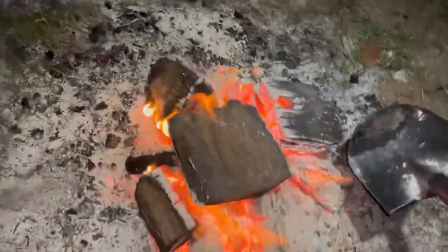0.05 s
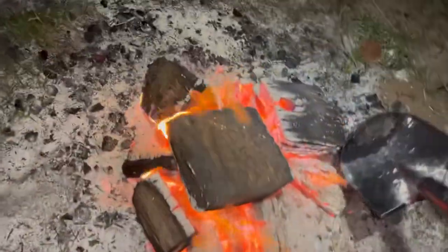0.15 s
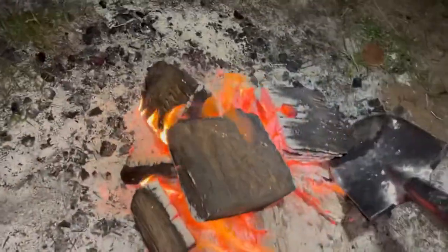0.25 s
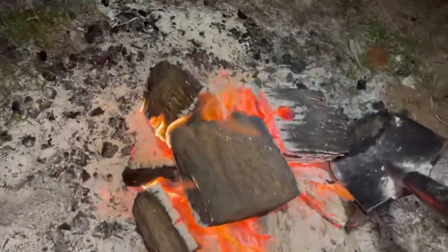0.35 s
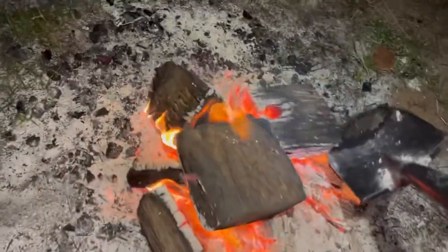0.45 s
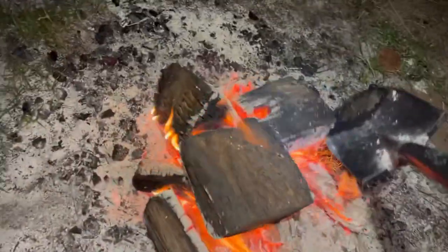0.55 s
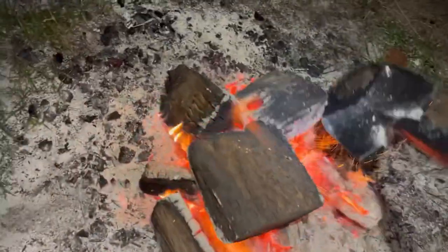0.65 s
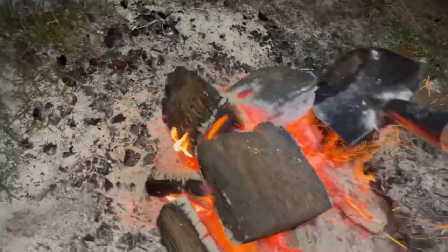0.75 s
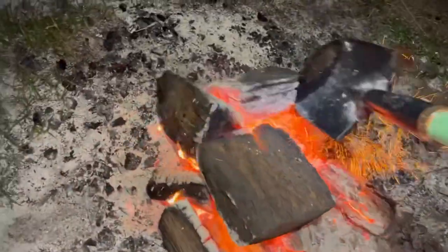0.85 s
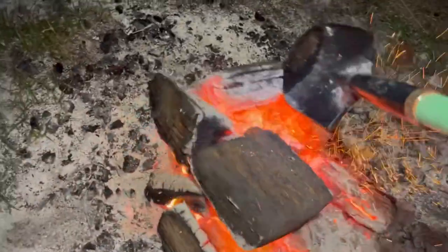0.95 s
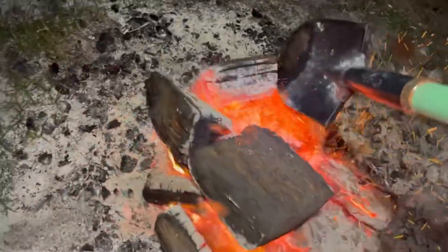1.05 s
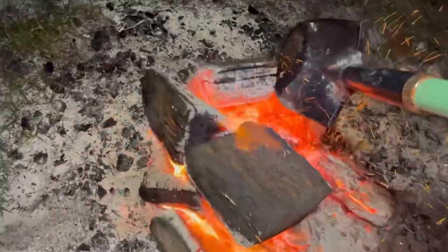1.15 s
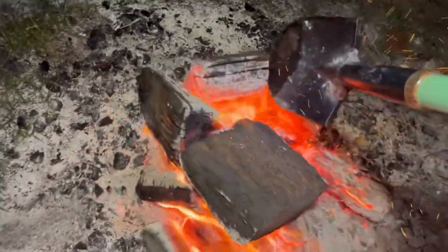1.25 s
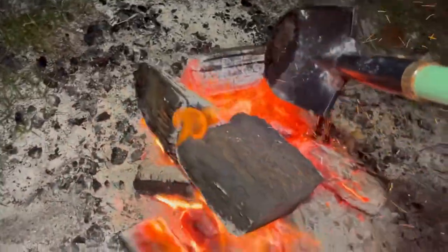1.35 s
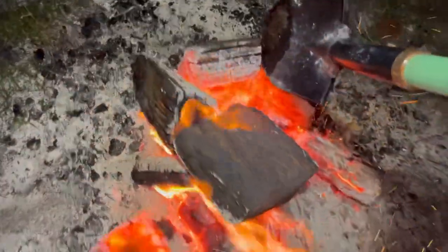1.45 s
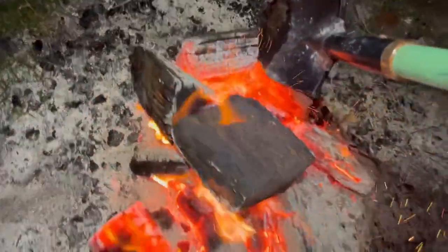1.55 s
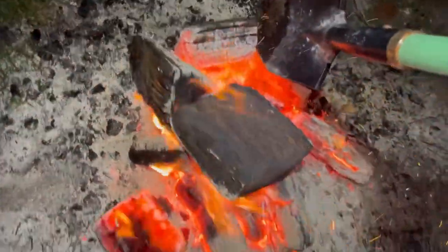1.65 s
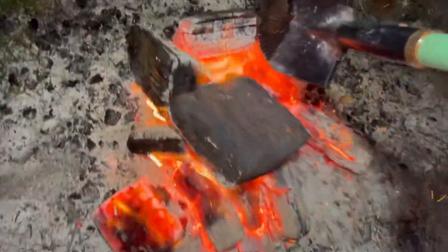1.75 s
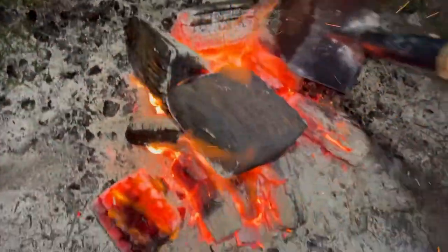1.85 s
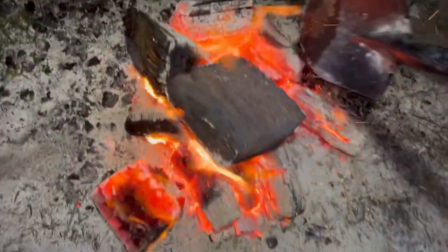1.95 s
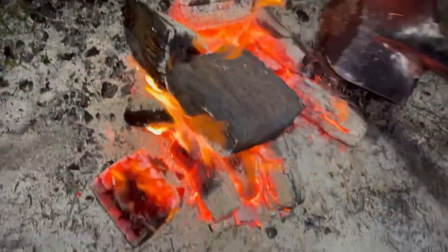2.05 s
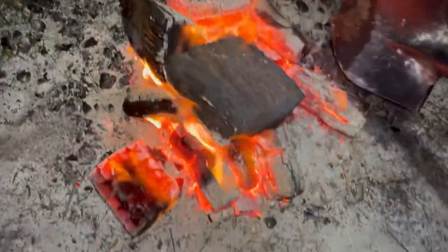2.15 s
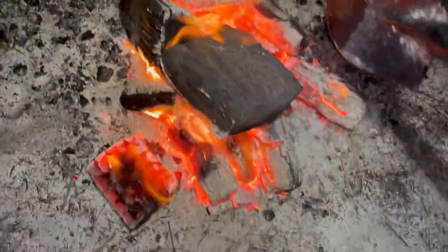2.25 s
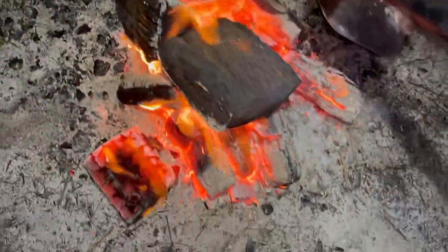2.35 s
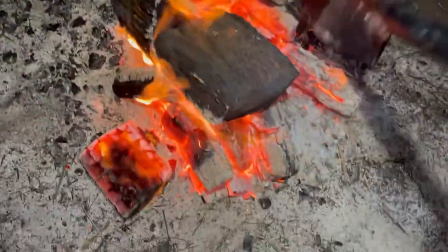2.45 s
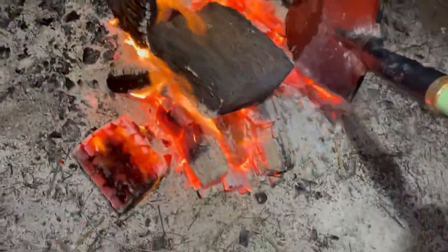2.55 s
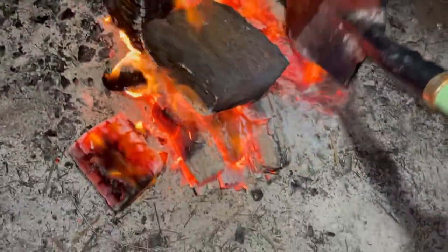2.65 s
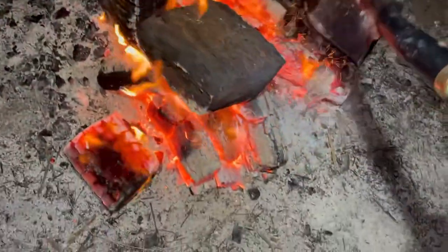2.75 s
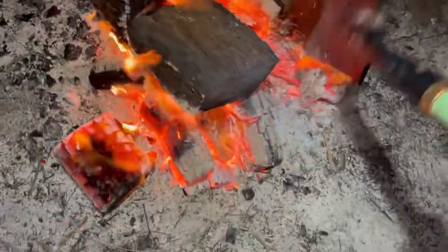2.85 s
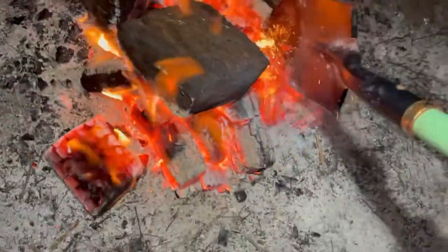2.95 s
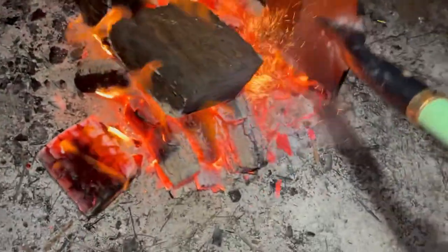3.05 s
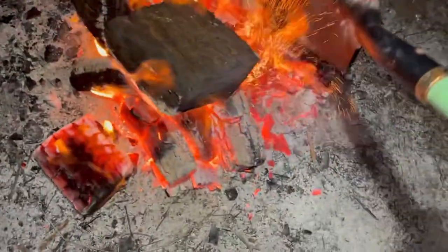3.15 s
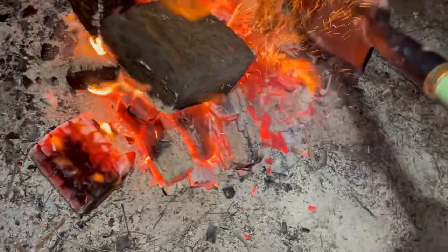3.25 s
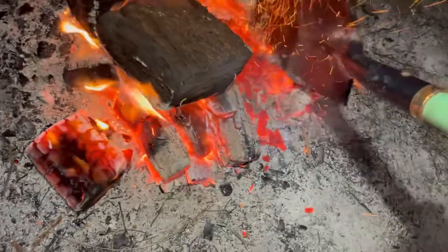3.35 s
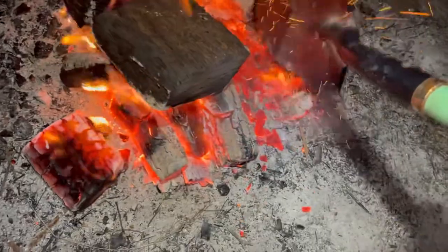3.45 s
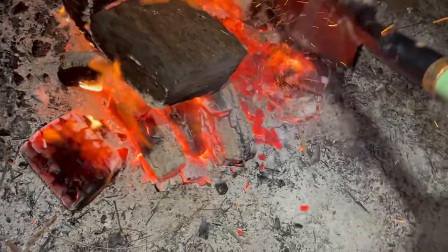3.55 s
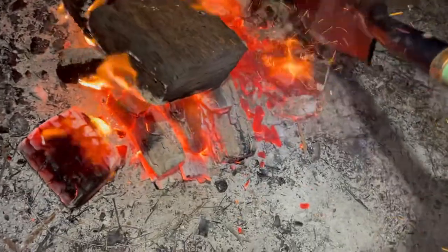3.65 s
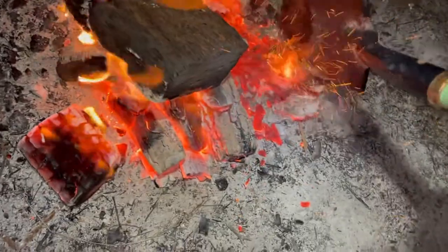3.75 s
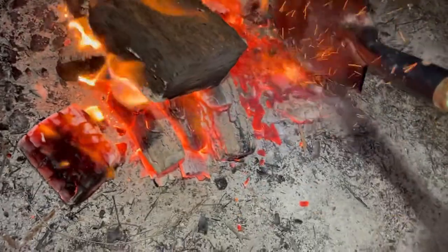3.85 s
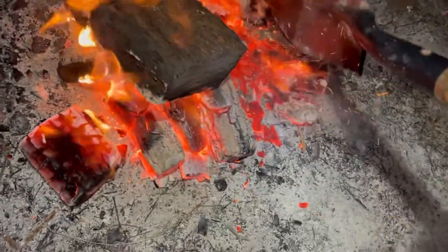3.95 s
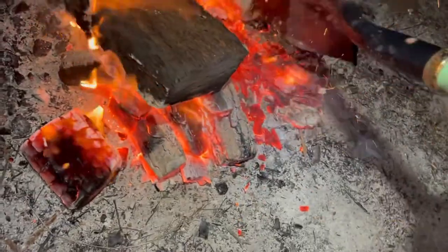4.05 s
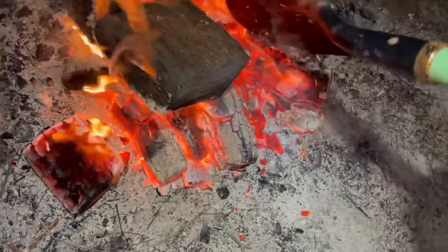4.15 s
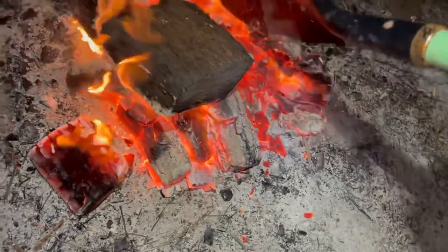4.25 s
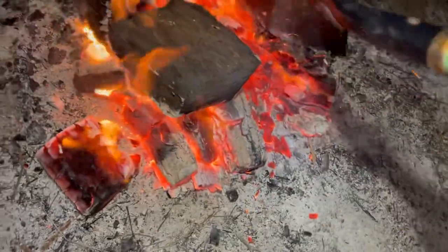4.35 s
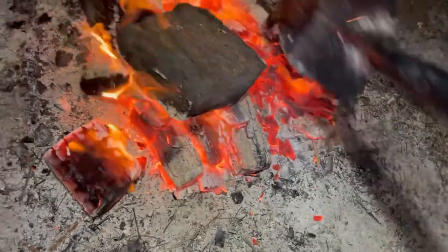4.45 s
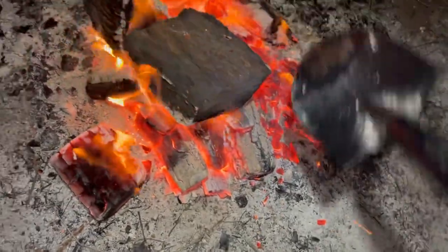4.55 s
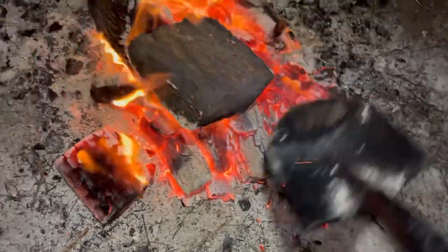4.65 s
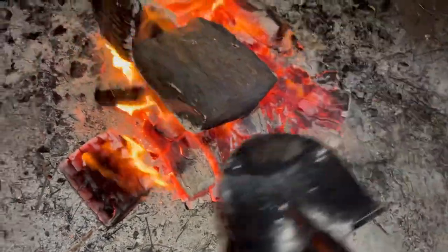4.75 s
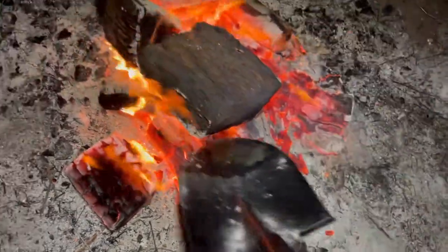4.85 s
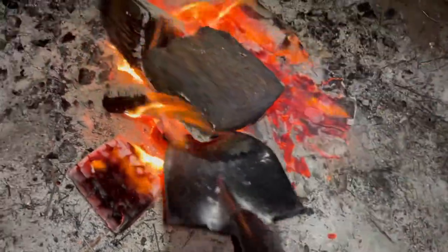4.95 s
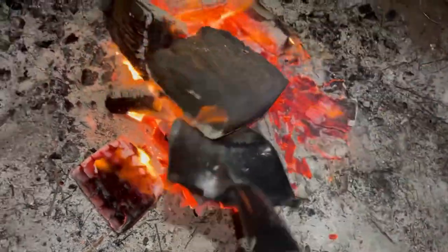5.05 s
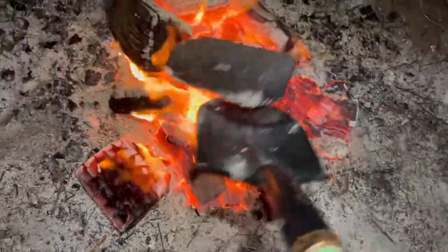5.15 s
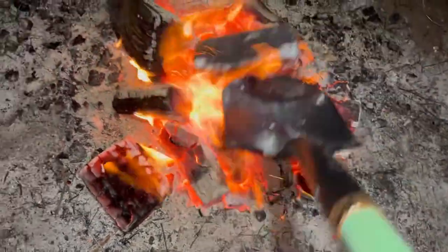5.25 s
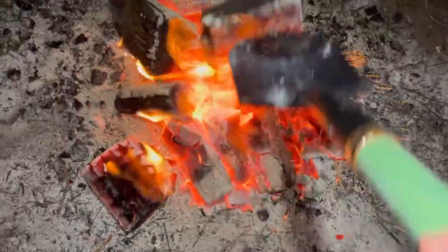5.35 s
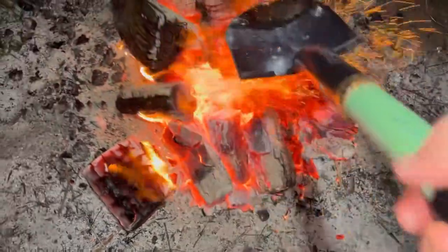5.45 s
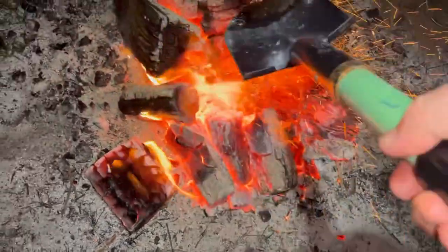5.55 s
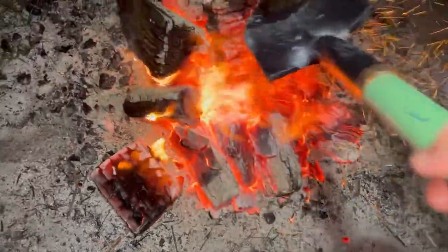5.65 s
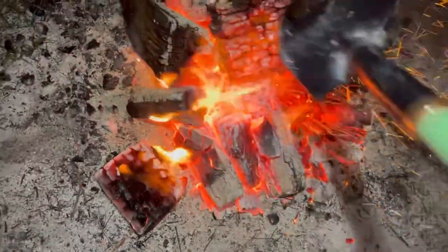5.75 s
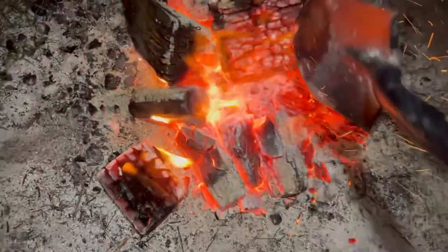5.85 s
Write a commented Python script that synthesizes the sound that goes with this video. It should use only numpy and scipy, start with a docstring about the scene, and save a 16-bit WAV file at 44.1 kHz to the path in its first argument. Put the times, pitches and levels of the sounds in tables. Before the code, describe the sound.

Close stereo view of a night campfire outdoors. A steel shovel grates through ash and coals for nearly two seconds, clinking and snapping, then chops charred wood four times with bright crunches and crumbling bits. After a pause it scrapes again and ends in a loud knock. Low flames flutter, embers sizzle faintly, crickets chirp and a distant motor hums beneath soft air hiss.

```python
"""A steel shovel scrapes through the coals of a campfire at night, chops four times into a charred log and
shoves the wood about: bursts of tiny breaks crunch and rattle charcoal pieces, and damped modes ring in the blade.
Short noise bursts make sharp cracks and ticks, low sine swings the thuds, fine breaks the sizzle and a dusty scuff.
Filtered noise rumbles as flames close to the microphone and hisses as the open air further off;
two crickets chirp in blurred tones, and a distant motor hums as one wavering sine."""
import sys
import numpy as np
from scipy import signal
from scipy.fft import rfft, irfft
from scipy.io import wavfile

SR = 44100
rng = np.random.default_rng(int(sys.argv[2]) if len(sys.argv) > 2 else 0)


def store_pcm(level_fs):
    """Save levels as 16-bit WAV."""
    pcm = np.round(np.clip(level_fs, -1, 1) * 32767).astype(np.int16)
    wavfile.write(sys.argv[1], SR, np.atleast_2d(pcm).T)


N = 260631
TIME = np.arange(N) / SR

# the blade strikes or catches on charcoal; body and ring are set before their overall trims:
# (time [s], level [dB], length of the bite [s], dull body [dB], blade ring against the bite [dB],
#  clank pitch [Hz], clank against the bite [dB])
BITES = [(0.473, -45, 0.015, 2, -8, 3380, -21), (.684, -44.5, 0.017, -13, -11, 2900, -18),
         (.812, -47.5, 0.0084, 2, -9, 3000, -4), (1.427, -54, 0.0026, 16, -10, 1050, 8),
         (1.593, -50.5, .002, 7, -7, 1670, 5.5), (2.495, -29, 0.013, 1.5, -14, 4800, -21),
         (2.859, -28.5, 0.027, -4.5, -6.5, 2540, -16), (2.93, -53, .004, 13.5, 7, 3450, -7),
         (2.943, -58.5, 0.022, 2, 11, 2440, 5.5), (3.305, -29, 0.016, -5.5, -5, 2960, -11),
         (3.688, -51.5, .018, 5.5, 7, 4500, -1.5), (3.714, -32, 0.015, .5, -6.5, 4840, -7),
         (5.123, -27, .0026, -27, -5.5, 2280, -20), (5.137, -41.5, 0.013, -20, -6, 2200, -10),
         (5.201, -44, 0.014, -1, 8, 3470, 0), (5.238, -41, 0.0095, 4, -7, 3570, -14),
         (5.363, -47, 0.0018, 10.5, -6, 2920, 1.5), (5.481, -53, .0024, 8, -13, 3420, 2)]


def gain_of(db):
    """Decibels to amplitude."""
    return 10 ** (np.asarray(db) / 20)


def evened(x):
    """Scales to rms 1."""
    return x / np.sqrt(np.mean(x ** 2) + 1e-20)


def read(points, hz):
    """Reads a table on a log-frequency axis."""
    f, value = np.transpose(points)
    return np.interp(np.log(hz + 1), np.log(f + 1), value)


def add(mix, s, sound):
    """Adds a sound to the mix at time s."""
    part = mix[max(round(s * SR), 0):][:len(sound)]
    part += sound[:len(part)]


def wander(rate_hz):
    """A smooth random curve of rms 1 that moves at about the given rate."""
    steps = np.arange(0, N + SR, SR / (8 * rate_hz))
    bell = signal.windows.gaussian(15, 1.8)
    slow = signal.fftconvolve(rng.standard_normal(len(steps)), bell, "same")
    return evened(np.interp(np.arange(N), steps, slow))


def colour(x, spectrum, size=2048):
    """Causal filter of energy 1 with the shape of the given spectrum."""
    log_gain = np.log(gain_of(read(spectrum, abs(np.fft.fftfreq(size, 1 / SR)))))
    minimum_phase = np.exp(np.conj(signal.hilbert(log_gain)))
    taps = np.fft.ifft(minimum_phase).real
    return signal.oaconvolve(x, taps / np.linalg.norm(taps))[:N]


def fractures(per_s, spread_db):
    """A train of tiny breaks of rms 1: many small, a few large."""
    at = np.flatnonzero(rng.random(N) < per_s / SR)
    draw = rng.uniform(-1, 1, N)[at]
    rarity = np.minimum(-np.log(abs(draw)), 4)  # the cap bounds the largest breaks
    out = np.zeros(N)
    out[at] = np.sign(draw) * gain_of(spread_db * rarity)
    return evened(out)


def ring(x, hz, width_hz):
    """One damped mode whose impulse response has energy 1."""
    r, turn = np.exp(-np.pi * width_hz / SR), 2 * np.pi * hz / SR
    feed = np.sqrt(2 * (1 - r * r)) * np.array([1, -r * np.cos(turn)])
    return signal.lfilter(feed, [1, -2 * r * np.cos(turn), r * r], x + 1e-18)


def chips(breaks, low_hz, high_hz, sharpness, count=60, size=400):
    """Each break rings one piece of charcoal: small pieces clink high, big ones low."""
    hz = np.geomspace(low_hz, high_hz, count)[:, None]
    damping = np.exp(-np.pi * hz / sharpness * TIME[:size])
    pieces = hz * damping * np.sin(2 * np.pi * hz * TIME[:size])
    pieces /= np.sqrt((pieces ** 2).sum(1).mean())
    at = np.flatnonzero(breaks)
    rings = breaks[at, None] * pieces[rng.integers(0, count, N)[at]]
    return np.bincount((at[:, None] + np.arange(size)).ravel(), rings.ravel(), N)[:N]


def chops(fall_s=0.01, body_rise_s=0.012, body_fall_s=0.0065, body_db=-1, ring_db=-4.0, clank_width_hz=260):
    """Each bite is a burst of breaks with a short clank; the log answers later. Returns sound and blade force."""
    # bright crunch of the charcoal: (frequency [Hz], relative level [dB])
    crunch_spectrum = [(300, -12.5), (1200, -12), (2000, -9), (3000, 7), (4700, 0.5), (6000, 5.5),
                       (8000, 3.5), (10500, 7.5), (12500, 1), (16000, 5)]
    # dull answer of the log: (frequency [Hz], relative level [dB])
    log_spectrum = [(60, -51), (170, 4.5), (290, -7), (450, 8), (580, 5.5), (720, -10), (1000, -1.5),
                    (1600, -1), (2400, -13), (6000, -43)]
    bite_rise_s = .0006
    # a bite into solid wood loses treble: slope of a crisp bite [dB an octave],
    # body level where dulling starts [dB], extra slope per dB of body
    crisp_tilt_db, dull_from_db, dulling = -1, -2, 0.72
    crack, push, clank, shake = np.zeros((4, N))
    t = TIME[:SR // 5]
    octaves = np.log2(np.maximum(np.fft.rfftfreq(len(t), 1 / SR), 1000) / 5000)
    breaks = fractures(per_s=8300, spread_db=2.5)
    for s, db, length, dull_db, blade_db, clank_hz, clank_db in BITES:
        after = np.maximum(t - length, 0)
        swell = (1 - np.exp(-t / bite_rise_s)) * np.exp(-after / fall_s)
        bite = gain_of(db) * swell * breaks[round(s * SR):][:len(t)]
        tilt_db = crisp_tilt_db - dulling * max(dull_db - dull_from_db, 0)
        add(crack, s, irfft(rfft(bite) * gain_of(tilt_db * octaves), len(t)))
        add(clank, s, gain_of(clank_db) * ring(bite, clank_hz, clank_width_hz))
        body_swell = (1 - np.exp(-t / body_rise_s)) * np.exp(-after / body_fall_s)
        add(push, s, gain_of(db + dull_db) * body_swell)
        add(shake, s, gain_of(blade_db) * bite)
    body = colour(push * fractures(per_s=5000, spread_db=3), log_spectrum)
    sound = colour(crack, crunch_spectrum) + clank + gain_of(body_db) * body
    return sound, gain_of(ring_db) * shake


def scrapes(ash_db=-6, grit_db=1, body_db=-2, ring_db=2):
    """Ash hisses under the blade, grit clinks in catches, lumps grind lower. Returns sound and blade force."""
    # three strokes through the coals, pressure on the blade before the trims: (time [s], grit level [dB])
    strokes = [
        [(.249, -59), (.254, -53), (.39, -59), (.67, -59.5), (.72, -57), (.86, -58.5), (.92, -53.5),
         (1.015, -51), (1.055, -71.5)],
        [(1.07, -73), (1.16, -61.5), (1.26, -55), (1.36, -61.5), (1.46, -58), (1.53, -62.5), (1.6, -55.5),
         (1.685, -51), (1.74, -72)],
        [(4.951, -70), (4.957, -57), (5.03, -64.5), (5.11, -53), (5.25, -55.5), (5.42, -71.5), (5.437, -48.5),
         (5.49, -67), (5.53, -70)],
    ]
    # big lumps grinding under each stroke, against its grit: (start [dB], halfway [dB], end [dB])
    lump_levels = [(-3.5, 6, -9), (0, -9.5, -14), (-1.5, -5, 4.5)]
    # hiss and clink of the grit: (frequency [Hz], relative level [dB])
    grit_spectrum = [(300, -6), (1200, -4.5), (2200, -5), (3500, -1), (5000, 2), (6000, -2.5), (8000, -3),
                     (10500, -3.5), (13000, -10.5), (16000, -1.5)]
    # low grind of the lumps: (frequency [Hz], relative level [dB])
    coal_spectrum = [(100, 9), (300, -3.5), (520, -1), (720, -7), (1000, -1.5), (1600, -3), (2500, -9.5),
                     (6000, -48)]
    # crumbs settle after every bite, more after a long one: level against the bite [dB],
    # for a bite of this length [s], fade [s], big lumps against the crumbs [dB]
    spill_db, spill_bite_s, spill_fade_s, spill_lumps_db = -29.5, 0.017, 0.11, -1.5
    grit, lumps = np.zeros((2, N))
    for stroke, lumps_db in zip(strokes, lump_levels):
        s, db = np.transpose(stroke)
        pressure = gain_of(np.interp(TIME, s, db, left=-np.inf, right=-np.inf))
        lump_times = np.linspace(s[0], s[-1], len(lumps_db))
        grit += pressure
        lumps += pressure * gain_of(np.interp(TIME, lump_times, lumps_db))
    for s, db, length, *_ in BITES:
        crumbs = gain_of(db + spill_db) * length / spill_bite_s * np.exp(-TIME[:SR] / spill_fade_s)
        add(grit, s + length, crumbs)
        add(lumps, s + length, gain_of(spill_lumps_db) * crumbs)
    catches = evened(gain_of(2.2 * wander(rate_hz=45)))
    ash = grit * catches * fractures(per_s=9000, spread_db=4.5)
    clinks = chips(grit * catches * fractures(per_s=1700, spread_db=3.3), 1800, 15000, sharpness=45)
    grind = chips(lumps * catches * fractures(per_s=1400, spread_db=3), 320, 3400, sharpness=12)
    fine = colour(gain_of(ash_db) * ash + gain_of(grit_db) * clinks, grit_spectrum)
    sound = fine + gain_of(body_db) * colour(grind, coal_spectrum)
    return sound, gain_of(ring_db) * ash


def blade(force, contact_db=4.5, count=80):
    """The steel rings, damped by the coals; as the contact moves, each mode is driven more or less."""
    # modes of the blade free of the coals: (pitch [Hz], relative drive [dB], t60 [s])
    modes = [(460, -5, .12), (565, -6, .1), (991, -2, .15), (1314, -3, .3), (1815, -3, .2), (2422, 2, .32),
             (2724, -5, .45), (2905, 3, .25), (3063, -5, .35), (3400, 2, .16), (3451, 3.5, .35),
             (4110, -3, .16), (4240, -5, .25), (4825, -2, .18), (5120, -6, .16), (6255, -5, .14),
             (6520, -9, .18), (7160, -5, .1), (7500, -6, .1), (7960, -4, .1), (8340, -4, .12),
             (8997, -5, .08), (9640, -3, .08), (11000, -6, .07), (11650, -6, .07), (14950, -9, .06)]
    coal_damping_hz = 7.9  # the coals press on the blade and widen each mode by this
    moments = np.linspace(0, TIME[-1], count)
    contact = evened(gain_of(contact_db * rng.standard_normal((len(modes), count))))
    out = np.zeros(N)
    for (hz, db, t60), drive in zip(modes, contact):
        width_hz = coal_damping_hz + np.log(1000) / np.pi / t60
        out += ring(force * np.interp(TIME, moments, gain_of(db) * drive), hz, width_hz)
    return out / np.sqrt(len(modes))


def thuds(decay_s=.008, rise_s=.0011):
    """A log settles into the ash: a few low, quickly damped swings."""
    # a soft thud as a log shifts: (time [s], level before its rise and decay [dB], pitch [Hz])
    shifts = [(.343, -44, 238), (4.244, -38, 165), (5.508, -40, 187)]
    out, t = np.zeros(N), TIME[:SR // 8]
    for s, db, hz in shifts:
        envelope = (1 - np.exp(-t / rise_s)) * np.exp(-t / decay_s)
        add(out, s, gain_of(db) * envelope * np.sin(2 * np.pi * hz * t))
    return out


def sharp_cracks(rows, half_band=1.265, crest_db=8):
    """Fire snaps, gritty catches and a hard knock: each a very short burst of noise around one pitch."""
    out, t = np.zeros(N), TIME[:SR // 25]
    for s, db, hz, decay_ms in rows:
        edges = [hz / half_band, min(hz * half_band, SR / 2 - 1000)]
        band = signal.butter(1, edges, "band", fs=SR)
        fade = np.exp(-1000 * t / decay_ms)
        crack = signal.lfilter(*band, rng.standard_normal(len(t))) * fade
        # crest_db is the allowance from the nominal peak down to the level of the noise
        add(out, s, gain_of(db - crest_db) * crack * np.linalg.norm(fade) / np.linalg.norm(crack))
    return out


def ticks(count=60):
    """The faint, chance snaps of the fire, as rows like those of the loud cracks."""
    per_s, peak_db, spread_db, centre_hz, decay_ms = 2, -55.5, 1, 10500, 1.4
    wait, size, pitch = rng.random((count, 3)).T
    times = np.cumsum(-np.log(1 - wait)) / per_s
    levels = peak_db + spread_db * (2 * size - 1)
    pitches = centre_hz * 2 ** ((pitch - .5) / 2)  # within a quarter octave either way
    return [(s, db, hz, decay_ms) for s, db, hz in zip(times, levels, pitches) if s < TIME[-1]]


def embers(level_db=-77, flare_db=2):
    """The glowing bed sizzles in fine breaks, flaring up and dying down."""
    sizzle = fractures(per_s=2500, spread_db=3.0) * evened(gain_of(flare_db * wander(rate_hz=10)))
    return gain_of(level_db) * colour(sizzle, [(500, -20), (3000, 1.0), (9000, -3.5), (16000, -7)])


def scuff():
    """Dry dust is pressed and pushed along the ground."""
    # strength of a soft scuff: (time [s], level [dB])
    press = [(2.2, -99), (2.273, -61.5), (2.33, -51), (2.37, -62.5), (2.45, -62)]
    # colour of the dust: (frequency [Hz], relative level [dB])
    dust_spectrum = [(90, -3), (220, 9.5), (400, 1), (750, -5.5), (1200, 0), (2400, -11), (4000, -6.5),
                     (6500, -12), (9000, -31), (16000, -27)]
    s, db = np.transpose(press)
    strength = gain_of(np.interp(TIME, s, db, left=-np.inf, right=-np.inf))
    return colour(strength * fractures(per_s=6400, spread_db=2.0), dust_spectrum)


def fireside(cracks):
    """What grinds, rings and crackles in and beside the fire."""
    bites, blows = chops()
    slides, rubbing = scrapes()
    return bites + slides + blade(blows + rubbing) + embers() + scuff() + sharp_cracks(cracks)


def flames(apart_db=-17, flutter_db=0.4, growth_db_per_s=0.7):
    """The low flutter of the fire, growing steadily with brief flares, nearly the same left and right."""
    # rumble of the flames: (frequency [Hz], relative level [dB])
    rumble_spectrum = [(15, -13.5), (28, -24), (42, -6), (62, -0.5), (90, -2), (130, -7.5), (170, -10.5),
                       (230, -19.5), (320, -37.5), (700, -74)]
    # brief flare-ups: (time [s], rise [dB])
    flare_ups = [(.97, 5.2), (2, 3.4), (4.15, 1.9), (4.83, 5.8), (5.25, 5.4)]
    draught_db, flare_s = -53, 0.056  # level at mid-scene, width of a flare-up
    shared, apart = (colour(rng.standard_normal(N), rumble_spectrum, size=8192) for _ in range(2))
    flares = sum(db * np.exp(-.5 * ((TIME - s) / flare_s) ** 2) for s, db in flare_ups)
    growth = growth_db_per_s * (TIME - TIME.mean())
    draught = gain_of(draught_db + growth + flares + flutter_db * wander(rate_hz=5))
    return draught * (shared + gain_of(apart_db) * np.array([apart, -apart]))


def chirps(count=24):
    """Each cricket keeps its own beat, with set drifts of tempo, pitch and level: (middle s, Hz, dB)."""
    # two crickets: (first chirp [s], period [s], change of the period per chirp [s], pitch at time 0 [Hz],
    #  pitch drift [Hz per s], level at time 0 [dB], level drift [dB per s])
    singers = [(.035, .267, -.00142, 2000, -4, -56, -0.31), (.02, .2637, 0, 2000, 37, -62, 1)]
    k = np.arange(count)
    for first, period, change, hz, hz_per_s, db, db_per_s in singers:
        for s in first + period * k + change * k ** 2 / 2:
            yield s, hz + hz_per_s * s, db + db_per_s * s


def crickets(blur_hz=85, chorus_db=-65, chorus_hz=2030, chorus_blur_hz=110):
    """Each chirp is a tone that swells and fades, blurred by its many paths through the trees."""
    out = np.zeros((2, N))
    swell = signal.windows.tukey(round(.22 * SR), .9)
    t = TIME[:len(swell)]
    for channel in out:
        paths = wander(blur_hz) + 1j * wander(blur_hz)
        for s, hz, db in chirps():
            blur = np.roll(paths, rng.integers(N))[:len(t)]
            tone = (blur * np.exp(2j * np.pi * hz * t)).real
            chirp = gain_of(db) * swell * evened(tone)
            start = s - t[-1] / 2
            add(channel, start, chirp[max(round(-start * SR), 0):])  # drop what lies before time 0
        turn = 2 * np.pi * chorus_hz * TIME  # the farthest ones merge into one steady band
        chorus = wander(chorus_blur_hz) * np.cos(turn) + wander(chorus_blur_hz) * np.sin(turn)
        channel += gain_of(chorus_db) * chorus
    return out


def motor(waver_hz=0.95):
    """One low wavering hum."""
    # distant motor: (time [s], mean pitch [Hz], rms level [dB])
    course = [(0, 117.5, -67), (.6, 118.9, -58.5), (1.4, 120.6, -76.5), (2, 121.5, -56), (2.8, 121.4, -53),
              (3.5, 130.9, -59.5), (5.91, 121.8, -61.5)]
    s, hz, db = np.transpose(course)
    turns = np.cumsum(np.interp(TIME, s, hz) + waver_hz * wander(rate_hz=6.1)) / SR
    return np.sqrt(2) * gain_of(np.interp(TIME, s, db)) * np.sin(2 * np.pi * turns)


def night(level_db=-64.5, shared=0.69):
    """The soft, wide hiss of the open air: noise partly shared by left and right."""
    # open air: (frequency [Hz], relative level [dB])
    air_spectrum = [(100, 1), (350, 2), (620, -3), (1100, 5), (1750, 4.5), (2200, 9), (2600, -11),
                    (3000, 4), (3350, -8), (3900, -0.5), (5000, -15), (6200, -18.5), (9000, -27),
                    (16000, -31.5)]
    common, left, right = (colour(rng.standard_normal(N), air_spectrum) for _ in range(3))
    return gain_of(level_db) * evened(shared * common + np.array([left, right]))


def stereo(shared, apart, size=1024):
    """Stereo processing turns the phase of near sounds between left and right; part of their grain differs."""
    # phase between the channels: (frequency [Hz], lead of the left [rad])
    stereo_phase = [(300, 0), (1400, -.5), (1900, -1.8), (2300, 0), (3200, -1.7), (4500, -.4), (5000, 0),
                    (5500, 2.6), (6700, 3.3), (7800, 6.2), (10000, 6.3), (11800, 9.4), (13600, 9.5),
                    (14700, 12.4)]
    # how alike the channels are: (frequency [Hz], likeness [0-1])
    stereo_likeness = [(600, .99), (1300, .85), (2000, .55), (2700, .88), (4100, .55), (6000, .6),
                       (8400, .98), (9700, .98), (10700, .7), (12400, .99), (14200, .7), (15300, .9)]
    # balance of the channels: (frequency [Hz], left minus right [dB])
    stereo_balance = [(150, -4.5), (600, 3), (1500, 1.5), (2200, 0), (4300, -5), (7500, 0.5), (15000, 0)]
    hz, side = np.fft.rfftfreq(size, 1 / SR), np.array([[1], [-1]])
    likeness = np.clip(read(stereo_likeness, hz), 0, 1)
    balance = gain_of(side * read(stereo_balance, hz) / 2)
    turned = balance * np.exp(.5j * side * read(stereo_phase, hz))
    alike, unlike = np.sqrt((1 + likeness) / 2), side * np.sqrt((1 - likeness) / 2)
    out = 0
    for x, share in (shared, alike), (apart, unlike):
        taps = np.roll(irfft(turned * share), size // 4, axis=1)
        out = out + signal.oaconvolve(x[None], taps, axes=1)[:, size // 4:][:, :N]  # undo the roll
    return out


def clearing(x, level_db=-18, fade_s=0.018):
    """A weak, short echo from the logs and the ground."""
    tail = rng.standard_normal((2, SR // 4)) * np.exp(-TIME[:SR // 4] / fade_s)
    tail /= np.linalg.norm(tail[0])
    scattered = signal.lfilter(*signal.butter(2, [1000, 6000], "band", fs=SR), x)
    return gain_of(level_db) * signal.oaconvolve(scattered[None], tail, axes=1)[:, :N]


def scene():
    """Shovel and fire close by, the night around them."""
    # sharp cracks: fire snaps, gritty catches of the blade, a hard knock of the shovel on wood:
    # (time [s], nominal peak level [dB], centre pitch [Hz], decay [ms])
    loud_cracks = [(.153, -42.5, 7700, .92), (.279, -30, 8950, 1), (.379, -38, 8900, 1.8),
                   (.687, -35, 9000, 3), (.816, -31.5, 6900, 1.9), (.909, -38, 8950, 0.92),
                   (.961, -24.5, 5940, .68), (1.058, -29.5, 11000, 0.99), (1.431, -29.5, 1590, 3.2),
                   (1.786, -39, 10900, 1.5), (3.727, -18, 4165, 3.1), (4.246, -43, 8504, 0.83),
                   (4.247, -38.5, 1110, 1.8), (4.720, -42.5, 9000, 3.8), (5.124, -21, 11100, 2.8),
                   (5.126, -21.5, 2540, 3.3), (5.4312, -12, 2820, 1.85), (5.432, -27.5, 1020, 2),
                   (5.598, -38, 7570, 1.1), (5.659, -42, 10140, 0.83)]
    around = flames() + crickets() + motor() + night()
    cracks = loud_cracks + ticks()
    near = fireside(cracks)
    other_grain = fireside(cracks)  # the same events with fresh random grain
    return stereo(near, other_grain) + clearing(near) + thuds() + around


def record(dry):
    """A steep low-pass takes away the treble above the band edge."""
    edge_hz = 16000
    taps = signal.firwin(255, edge_hz, window=("kaiser", 8), fs=SR)
    return signal.oaconvolve(dry, taps[None], "same")


dry = scene()
out = record(dry)
store_pcm(out)
```